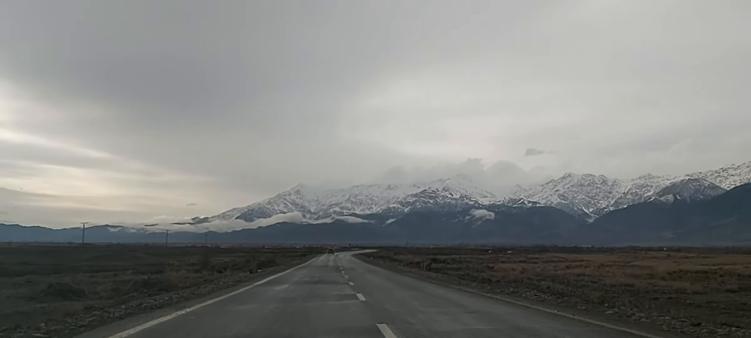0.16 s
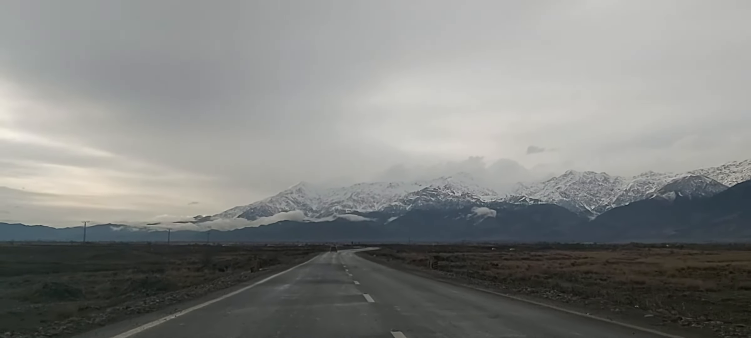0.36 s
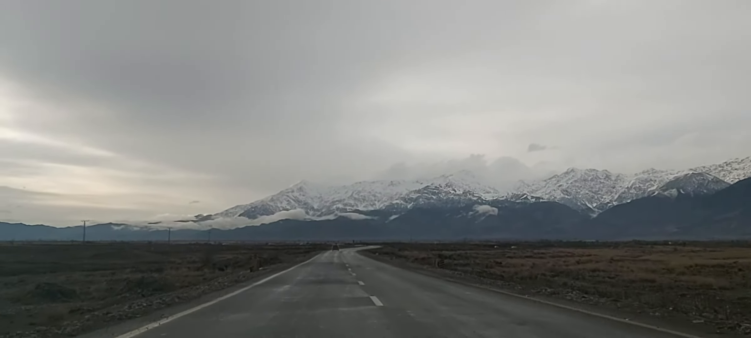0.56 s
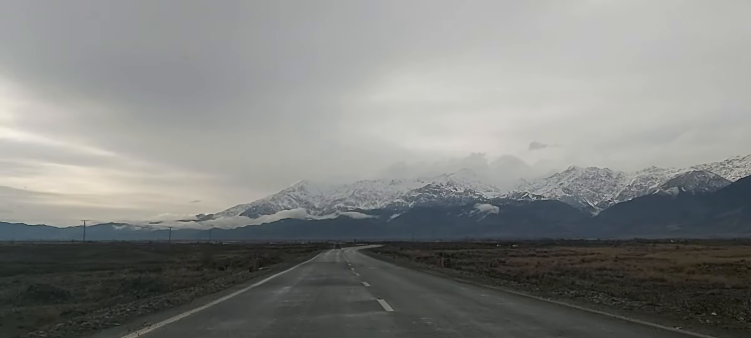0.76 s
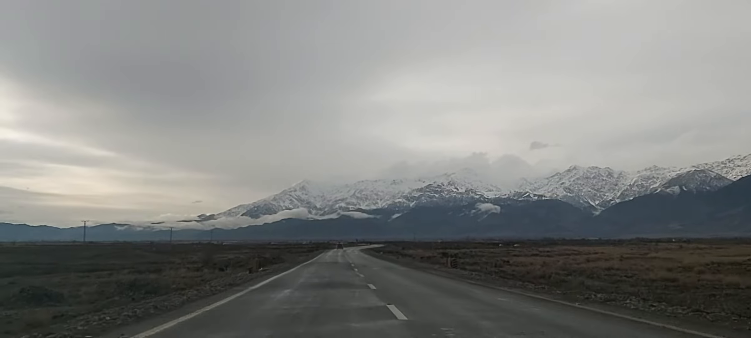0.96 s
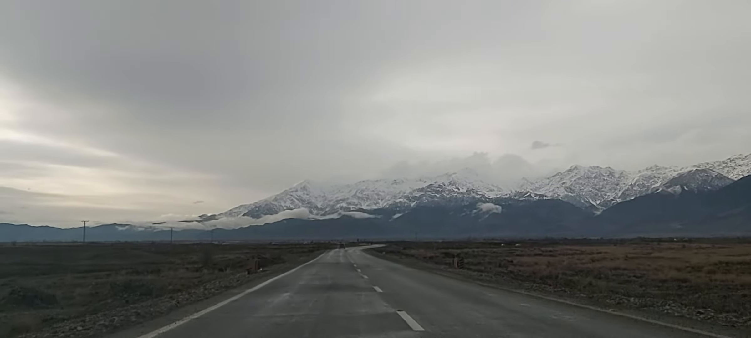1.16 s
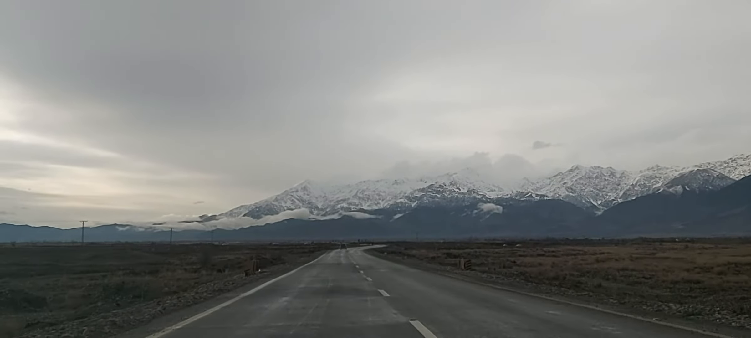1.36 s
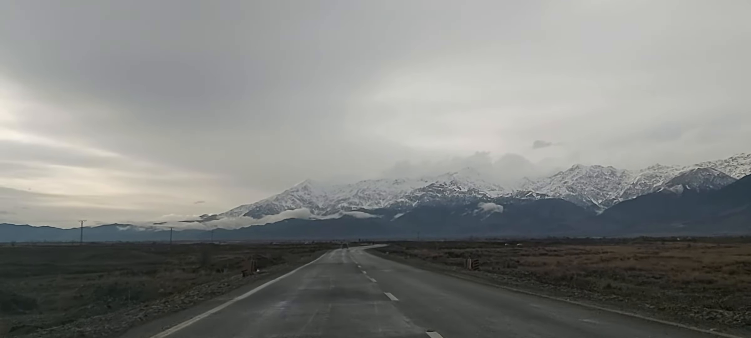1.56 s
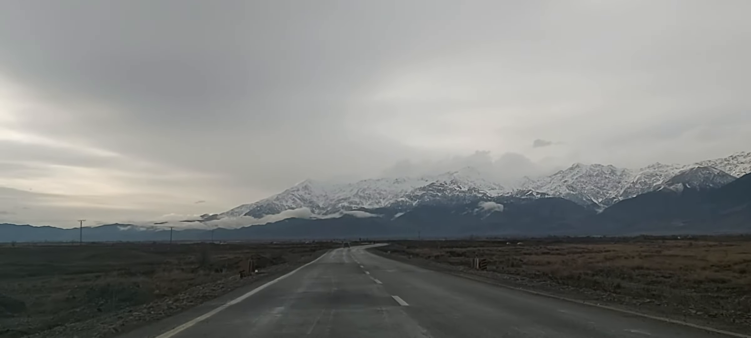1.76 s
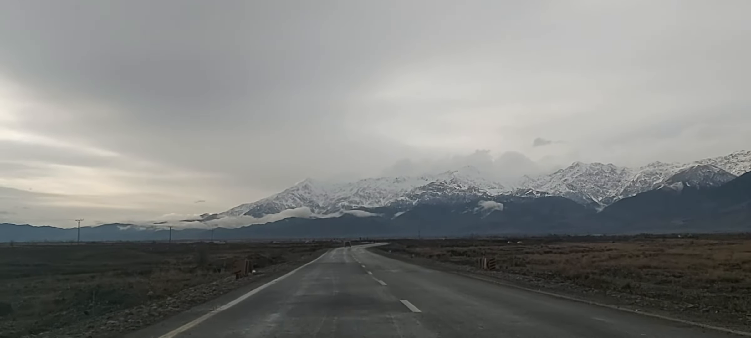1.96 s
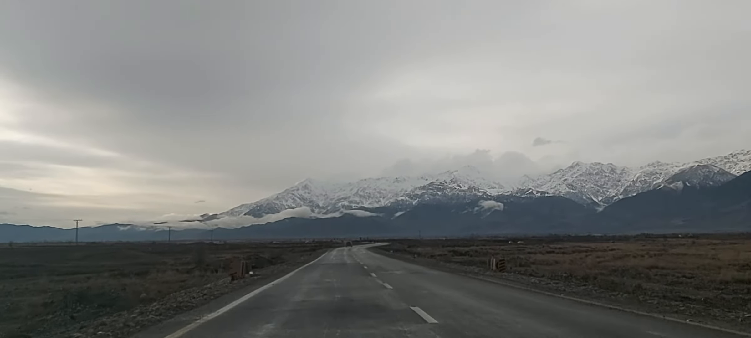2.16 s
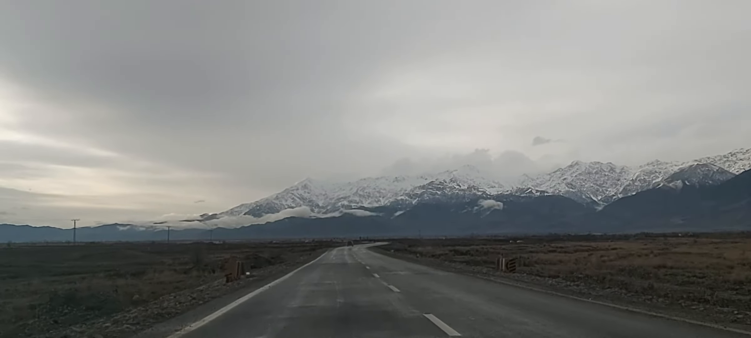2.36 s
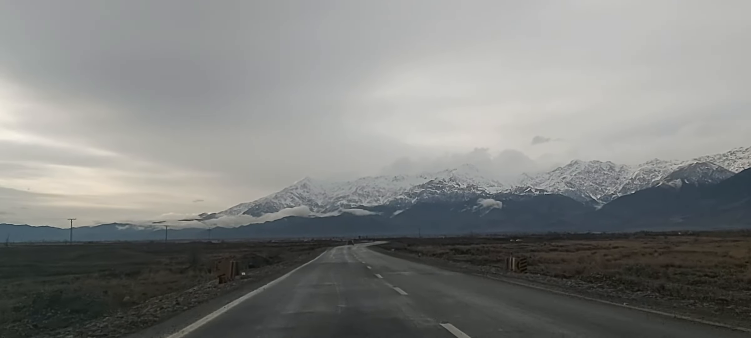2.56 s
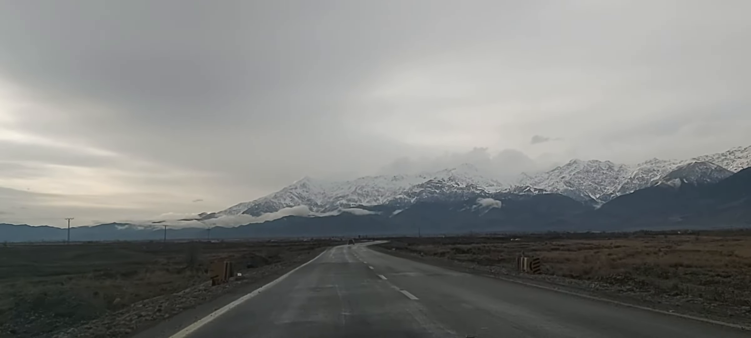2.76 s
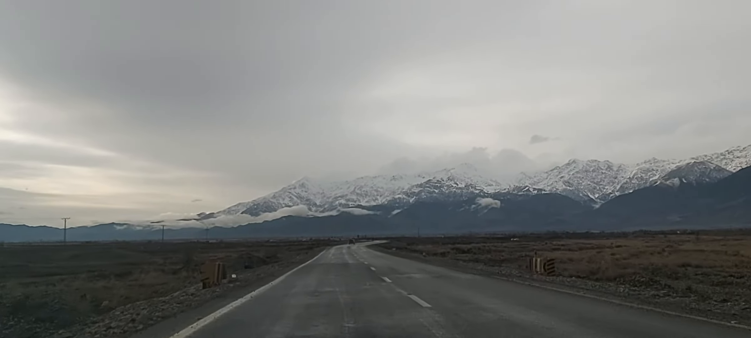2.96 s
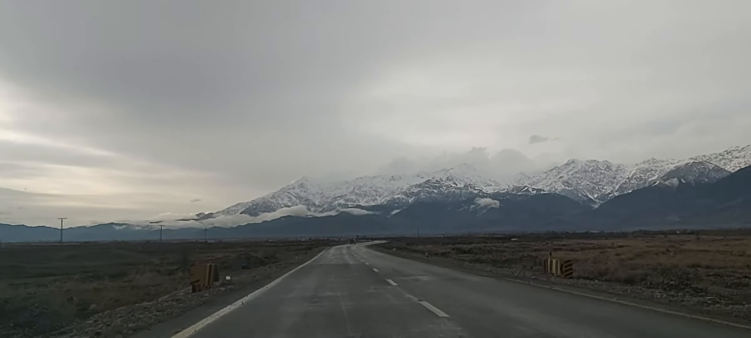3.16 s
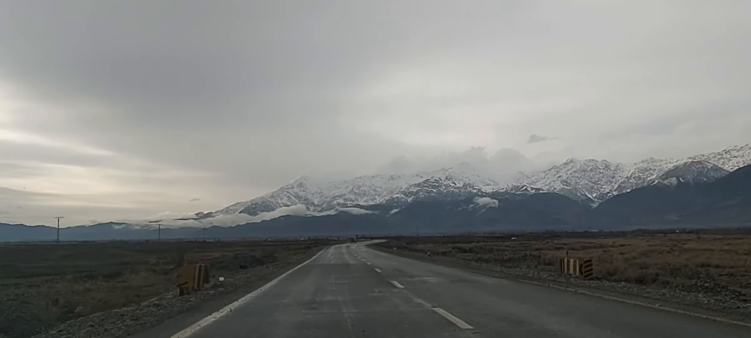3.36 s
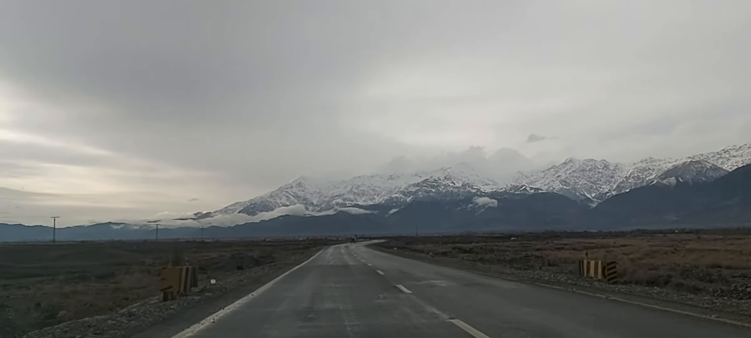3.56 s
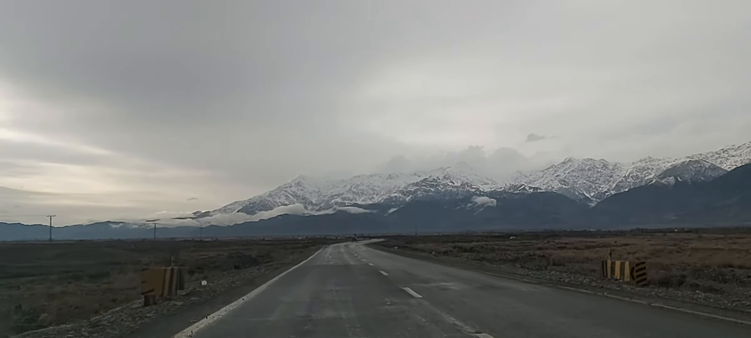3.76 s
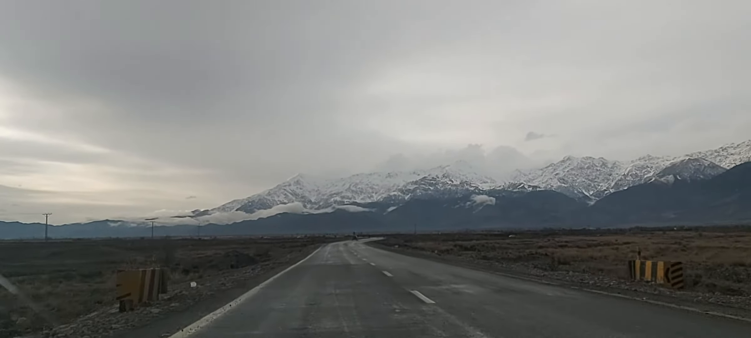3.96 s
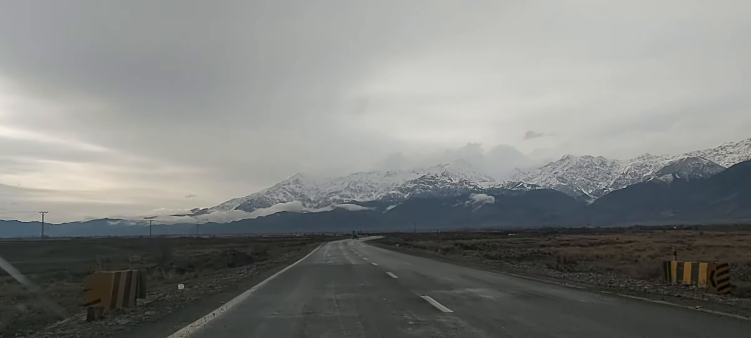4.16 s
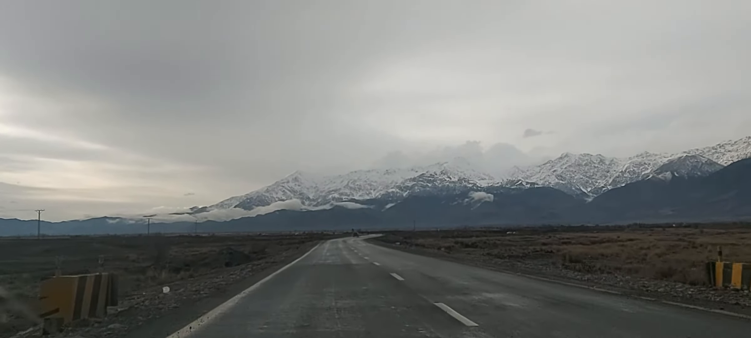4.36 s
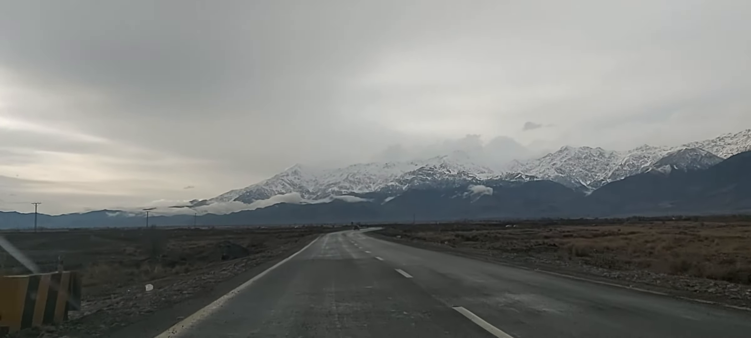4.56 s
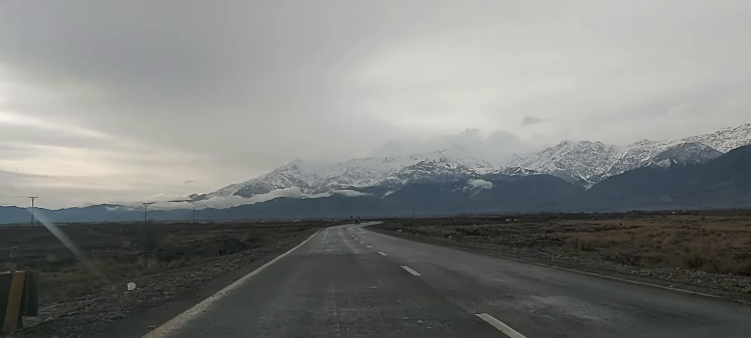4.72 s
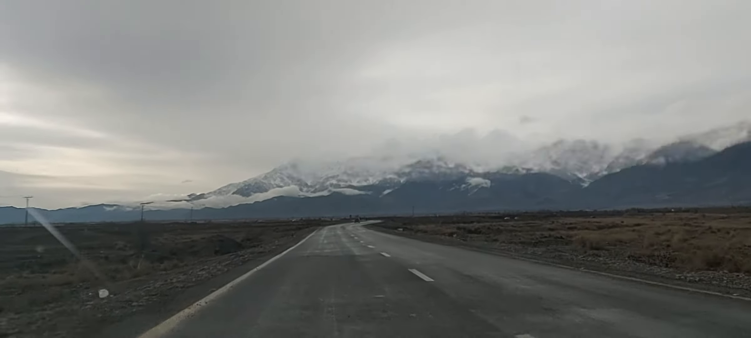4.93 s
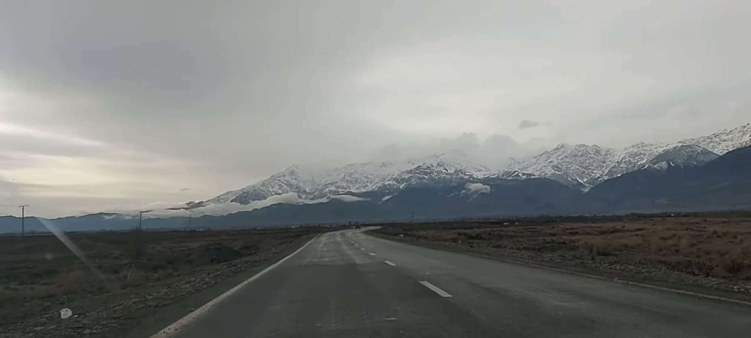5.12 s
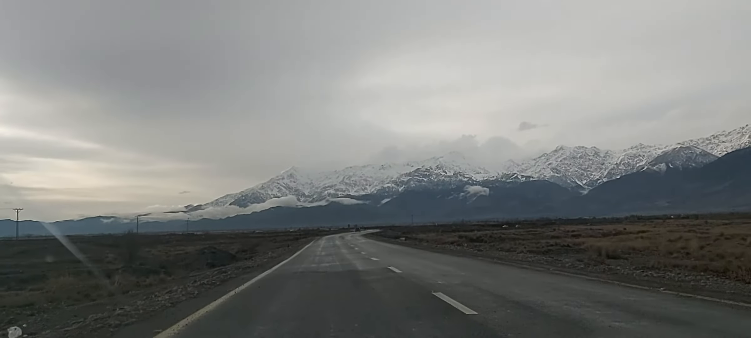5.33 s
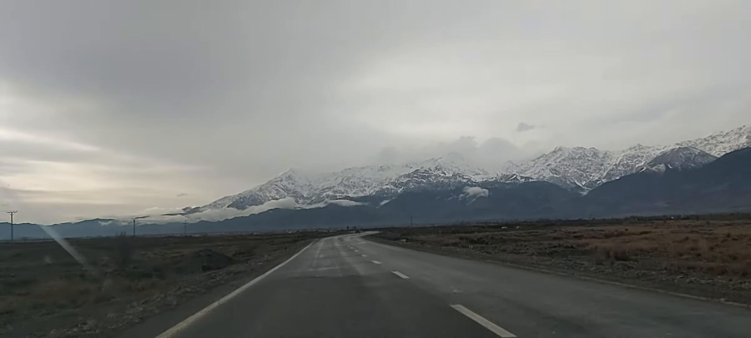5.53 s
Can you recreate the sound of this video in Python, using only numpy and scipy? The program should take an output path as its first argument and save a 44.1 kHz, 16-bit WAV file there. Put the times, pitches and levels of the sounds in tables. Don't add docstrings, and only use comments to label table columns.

```python
import sys
import numpy as np
from scipy import signal
from scipy.fft import rfft, irfft, next_fast_len
from scipy.io import wavfile
from scipy.ndimage import uniform_filter1d

SR = 44100
rng = np.random.default_rng(int(sys.argv[2]) if len(sys.argv) > 2 else 0)


def dump_mix(stems):
    frames = np.atleast_2d(stems).T
    limited = np.clip(frames, -1, 1)
    pcm = np.round(limited * 32767).astype(np.int16)
    wavfile.write(sys.argv[1], SR, pcm)


def field_ratio(decibels):
    return 10 ** (np.asarray(decibels, dtype=float) / 20)


N = 250929
SIZE = next_fast_len(N)
FREQ = np.fft.rfftfreq(SIZE, 1 / SR) + 1e-3
TIME = np.arange(N) / SR


def coloured(spectrum, points):
    hz, db = np.transpose(points)
    return spectrum * field_ratio(np.interp(np.log(FREQ), np.log(np.maximum(hz, 1)), db))


def unit(x):
    return x / np.sqrt(np.mean(x ** 2))


def curves(table):
    s, *columns = np.transpose(table)
    return [np.interp(TIME, s, c) for c in columns]


def walk(rate):
    hold = int(SR / rate)
    steps = np.repeat(rng.standard_normal(N // hold + 1), hold)
    return 1.3 * uniform_filter1d(uniform_filter1d(steps, hold), hold)[:N]


def sides(pan_db):
    gain = field_ratio(np.array([[pan_db / 2], [-pan_db / 2]]))
    return gain / gain.mean()


def add(out, s, sound):
    i = int(s * SR)
    out[:, i:i + sound.shape[1]] += sound[:, :N - i]


def ring(modes, t):
    total = 0
    for k, (hz, db, t60) in enumerate(modes):
        total = total + (-1) ** k * field_ratio(db - 60 * t / t60) * np.sin(2 * np.pi * hz * t)
    return total


# f/Hz, left-right correlation
PORT_CORRELATION = [(30, 0.91), (200, 0.96), (400, 0.71), (700, 0.2), (1100, -0.41), (2500, .05),
                    (8000, -0.15)]
# f/Hz, left minus right level/dB
PORT_LEAN = [(60, -2), (110, -5.5), (200, -4), (380, -5), (700, -3.5), (1290, -5), (2380, -9.5),
             (4400, -8.5), (8120, -8), (15000, -9)]


def rush(colour, edges_hz, flicker_db, rate):
    hz, alike = np.transpose(PORT_CORRELATION)
    alike = np.interp(np.log(FREQ), np.log(hz), alike)
    mid, side = (coloured(rfft(rng.standard_normal(SIZE)), colour) for _ in range(2))
    mid, side = mid * np.sqrt(1 + alike), side * np.sqrt(1 - alike)
    lean = np.sqrt(coloured(np.ones(len(FREQ)), PORT_LEAN))
    pair = np.array([(mid + side) * lean, (mid - side) / lean])
    out = 0
    for lo, hi in zip(edges_hz, edges_hz[1:]):
        rise = np.clip(.5 + 6 * np.log(FREQ / lo), 0, 1)
        fall = np.clip(.5 - 6 * np.log(FREQ / hi), 0, 1)
        band = irfft(pair * np.sin(rise * fall * np.pi / 2), SIZE)[:, :N]
        out = out + band * field_ratio(flicker_db * walk(rate))
    return out / np.sqrt(np.mean(out.mean(axis=0) ** 2))


# t/s, roughness level/dB
ROUGHNESS = [(0, 3.5), (.14, -2.5), (.45, 4), (.6, 3.5), (.76, -2.5), (.88, 4), (1.1, -8), (2.12, -7),
             (2.2, -1), (2.5, -6.5), (2.7, 7), (2.79, -2.5), (2.88, 1), (3.3, -1.5), (3.44, -5.5),
             (3.55, 1), (5.55, 1), (5.69, -10.5)]
# f/Hz, spectral level/dB per Hz
BOOM_COLOUR = [(15, -30.5), (25, -18), (34, -12.5), (44, -7), (50, 1.5), (56, -5.5), (68, -11.5),
               (85, -4.5)]
# f/Hz, spectral level/dB per Hz
ROAD_COLOUR = [(60, -12), (80, 0), (124, -6), (140, -5), (153, -11.5), (189, -5.5), (207, -7), (222, -15.5),
               (255, -5), (278, -12.5), (298, -1.5), (315, -6), (338, -19.5), (420, -14)]


def road():
    rough_db, = curves(ROUGHNESS)
    boom = rush(BOOM_COLOUR, [12, 80], flicker_db=0.4, rate=6.7)
    floor = rush(ROAD_COLOUR, [85, 110, 146.6, 240.5], flicker_db=0.7, rate=12)
    floor_share = 0.37
    return field_ratio(-23.5 + rough_db) * boom + field_ratio(-27 + floor_share * rough_db) * floor


# t/s, level/dB, f/Hz, length/s, growth/dB
THUMPS = [(.43, -13.5, 141, 0.052, -2.5), (.803, -16.5, 115.3, 0.019, 2), (.826, -5.5, 134, 0.046, -6),
          (.877, -6, 135.3, .07, -7.5), (2.868, -14, 121.5, 0.033, 13.5), (4.159, -6, 125, 0.029, -0.5),
          (4.57, -20, 118.1, 0.033, -2), (4.962, -8.5, 123, 0.029, -9), (5.325, -2.5, 135, .04, -11),
          (5.369, -8.5, 143, 0.017, -5.5), (5.398, -1.5, 137.7, 0.045, -11),
          (5.546, -1.5, 142.4, 0.03, -6.5), (5.574, -13.5, 144, 0.025, -3),
          (5.626, -7, 144.9, 0.069, -14.5)]


def thumps():
    out = np.zeros((2, N))
    panel_hz, edge_s = 134, 0.0071
    for s, db, hz, length, growth_db in THUMPS:
        samples = length * SR + 200
        u = np.arange(int(length * SR) + 200) / samples
        from_edge_s = np.minimum(u, 1 - u) * len(u) / SR
        swell = field_ratio(db + growth_db * u) * np.tanh((from_edge_s / edge_s) ** 2)
        pitch = hz + max(panel_hz - hz, 0) * u
        add(out, s - .002, swell * np.sin(2 * np.pi * np.cumsum(pitch) / SR) * sides(-3.0))
    return out


# t/s, firing rate f/Hz, load level/dB
ENGINE = [(0, 62.02, -2), (.5, 63.94, 1.5), (1.0, 65.02, -1.5), (1.6, 65.54, -1), (2.1, 66.32, 0),
          (2.45, 66.14, 2), (2.65, 62.63, -5.5), (2.95, 59.92, 3), (3.5, 59.84, -1.5), (4.4, 59.05, 1.5),
          (4.6, 55.93, -2), (4.9, 55.96, -1.5), (5.05, 58.64, -1.5), (5.69, 55.87, -2.5)]
# f/Hz, level/dB
MOUNTS = [(57, -26.5), (62, -27), (66, -36), (112, -27.5), (132, -30), (178, -32.5), (190, -42), (198, -35)]
# f/Hz, level/dB; only the points after the first are used
MOUNTS_TOP = [(198, -33), (230, -46)]


def engine():
    hz, load_db = curves(ENGINE)
    phase = 2 * np.pi * np.cumsum(hz * (1 + 0.0027 * walk(6))) / SR
    mount_hz, mount_db = np.transpose(MOUNTS + MOUNTS_TOP[1:])
    hum = 0
    for k in range(1, 5):
        level_db = load_db + np.interp(k * hz, mount_hz, mount_db) + 1.9 * walk(8.0)
        hum = hum + field_ratio(level_db) * np.sin(k * phase + k)
    return np.sqrt(2) * hum * sides(-3.5)


def case_hits(events, modes, again_db, tail_db, muffle, thin):
    out, t = np.zeros((2, N)), TIME[:2000] - .001
    chance = rng.standard_normal((len(events), 2, len(t)))
    after = np.maximum(t, 0)
    for (s, db, pan_db, hz, crack_db), noise in zip(events, chance):
        push = np.where(t < 0, np.exp(-(t * hz / .3) ** 2), np.exp(-(after * hz / .8) ** 1.5))
        hit = push * np.cos(2 * np.pi * hz * t) + field_ratio(crack_db) * ring(modes, after)
        hit = hit + field_ratio(again_db) * np.roll(uniform_filter1d(hit, size=5), 95)
        dull = hit + muffle * (uniform_filter1d(hit, size=4) - hit) - thin * uniform_filter1d(hit, size=11)
        far = field_ratio(-abs(pan_db)) * (np.roll(dull, 22) - .5 * np.roll(dull, 36))
        scatter = noise * np.exp(-TIME[:len(t)] / 0.007)
        tail = field_ratio(tail_db) * signal.fftconvolve(scatter, dull[None, :200], axes=1)[:, :len(t)]
        ports = np.array([hit, far] if pan_db > 0 else [far, hit])
        add(out, s - .001, field_ratio(db) * (ports + tail))
    return out


# t/s, near port level/dB, left minus right level/dB, knock f/Hz, crack above knock level/dB
TAPS = [
    (.6815, -47, -7.5, 975, -0.5),
    (4.9757, -36, 9, 2000, 0),
    (5.114, -18, -10.5, 1700, -6),
    (5.1662, -36, 2, 1303, -1),
    (5.2065, -14, -26, 1250, -16),
    (5.5389, -23.5, -19, 1542, -7.5),
    (5.597, -38, -6.5, 1800, -4),
]
# f/Hz, level/dB, t60/s
CASE_MODES = [(3600, 3.5, .003), (5603, -3, 0.0017), (7400, -4, 0.0015), (10000, -5, .0012),
              (14300, -8, .0012)]
LEFT_SNAP = [
    (4.8129, -14, 37, 1700, 2.5),
]
# f/Hz, level/dB, t60/s
LEFT_MODES = [(3250, 1.5, 0.0021), (4330, -1.5, 0.0059), (5800, -2.5, 0.0013), (8000, -9, 0.0017),
              (11000, -5, 0.0014), (15000, -14, .001)]
RIGHT_SNAP = [
    (4.9151, -18.5, -11, 660, 19),
]
# f/Hz, level/dB, t60/s
RIGHT_MODES = [(2380, -14.5, 0.004), (4430, -14.5, 0.0032), (5400, -18, 0.0042), (7440, -12.5, 0.0026),
               (10800, -5, 0.0012), (15200, 0, .0012)]


def taps():
    soft = case_hits(TAPS, CASE_MODES, again_db=-27.5, tail_db=-36, muffle=.3, thin=.8)
    left = case_hits(LEFT_SNAP, LEFT_MODES, again_db=-19, tail_db=-39, muffle=.2, thin=0.34)
    right = case_hits(RIGHT_SNAP, RIGHT_MODES, again_db=-1.5, tail_db=-44, muffle=0.28, thin=.1)
    return soft - left + right


# t/s, length/s, level/dB, centre f/Hz
RUB = [
    (4.845, 0.054, -59.5, 5407),
    (4.971, 0.03, -62.5, 6900),
    (5.144, .075, -62, 6490),
    (5.498, .07, -69, 6900),
    (5.594, .008, -63, 6900),
]


def rub():
    edges_hz = [2500, 7000, 17000]
    dull = rush([(2500, -22.0), (4000, -2), (5200, 3), (7000, -6.5), (8400, -18), (10500, -15), (16000, -11.5)],
                edges_hz, flicker_db=3.0, rate=130)
    sharp = rush([(3000, -25.5), (5500, -2), (7500, -5), (8400, -12), (11000, -8), (16000, -14)],
                 edges_hz, flicker_db=2.0, rate=100)
    edge_s, fade_s, press_db = .01, .02, 3
    out = 0
    for s, length, db, hz in RUB:
        u = np.clip((TIME - s) / length, 0, 1)
        off = np.maximum((s - TIME) / edge_s, (TIME - s - length) / fade_s).clip(0)
        bright = np.clip((hz - 4500) / 2500, 0, 1)
        out = out + field_ratio(db + press_db * u) * np.exp(-off) * ((1 - bright) * dull + bright * sharp)
    return out * sides(12.5)


def housing_strikes(events, modes, snap, snap_db, pan_db, spread_s, trim_db):
    out, t = np.zeros((2, N)), TIME[:5000]
    echoes = (1 - np.exp(-t / 0.00091)) * (np.exp(-t / spread_s) + field_ratio(-20.0) * np.exp(-t / 0.05))
    impulse = np.fft.fftshift(irfft(coloured(np.ones(len(FREQ)), snap), SIZE))
    impulse = impulse[SIZE // 2 - 64:SIZE // 2 + 64]
    scatter = rng.standard_normal((2, len(t)))
    loose = rng.standard_normal((len(events), 2, len(t)))
    for (s, db), chance in zip(events, loose):
        burst = signal.fftconvolve(echoes * (scatter + .4 * chance), impulse[None], axes=1)
        click = field_ratio(snap_db) * unit(burst[:, 64:64 + len(t)])
        housing = 0
        for (hz, mode_db, t60, start), nudge in zip(modes, chance[0]):
            age = np.maximum(t - start, 0)
            ports = np.array([[1.02 * (1550 / hz) ** 2.5], [1]])
            build_up = 1 - np.exp(-age / 0.0013)
            housing = housing + ports * build_up * ring([(hz, mode_db + .8 * nudge, t60)], age)
        click = click + unit(housing)
        click[0] = np.roll(click[0], 40)
        add(out, s - .001, field_ratio(db + trim_db) * unit(click) * sides(pan_db))
    return out


# t/s, rms level/dB
TOCKS = [
    (0.265, -29),
    (0.9265, -32.5),
    (1.6116, -31.5),
    (2.2965, -30.5),
    (2.9816, -30),
    (3.6665, -30.5),
    (4.3511, -32),
    (5.0355, -30.5),
]
# f/Hz, level/dB, t60/s, start t/s
TOCK_MODES = [(1635, 6, 0.027, 0.0062), (1957, -17, 0.025, 0.0066), (2390, -7, 0.058, .001),
              (2545, -1, 0.045, 0.0016), (2850, -9.5, .03, 0.0014), (3362, -3.5, 0.04, 0.001404),
              (3580, -8.5, 0.021, .001)]
# f/Hz, spectral level/dB per Hz
TOCK_SNAP = [(900, -35), (1500, -7), (2500, -11), (3500, -11), (4600, -25.5), (5600, -23), (6500, -18),
             (7600, -21), (8600, -34.5), (11500, -28), (13500, -32), (16000, -33.5)]
# t/s, rms level/dB
TICKS = [
    (0.6071, -34),
    (1.2685, -35),
    (1.9535, -35.5),
    (2.6388, -32.5),
    (3.3237, -34.5),
    (4.0088, -35.5),
    (4.6938, -36),
    (5.3785, -36.5),
]
# f/Hz, level/dB, t60/s, start t/s
TICK_MODES = [(1600, -0.5, .03, 0.0024), (2024, -6, 0.038, .006), (2340, -1, 0.034, .001),
              (2660, 2, .018, .0003), (2945, -2.5, 0.015, .004), (3650, -6.5, .035, 0.00203),
              (6710, -7, 0.02, 0.0045)]
# f/Hz, spectral level/dB per Hz
TICK_SNAP = [(900, -35), (1500, -26.5), (2500, -0.5), (3700, -13.5), (5000, -21), (6700, -16),
             (8100, -27.5), (9600, -16), (11200, -20), (13500, -18.5), (16000, -26.5)]


def indicator():
    tocks = housing_strikes(TOCKS, TOCK_MODES, TOCK_SNAP, snap_db=-3.5, pan_db=-10, spread_s=0.012, trim_db=-17.5)
    ticks = housing_strikes(TICKS, TICK_MODES, TICK_SNAP, snap_db=4.5, pan_db=-10.5, spread_s=0.012, trim_db=-18.5)
    return tocks + ticks


# t/s, rms level/dB
RATTLES = [
    (.482, -40.5),
    (.81, -37),
]
# f/Hz, level/dB, t60/s, start t/s
RATTLE_MODES = [(1250, 0, .02, 0.00097), (1700, -5.5, .02, 0.009), (2360, -6, .02, .002)]
# f/Hz, spectral level/dB per Hz
RATTLE_SNAP = [(700, -34), (1300, 3.5), (2500, -2), (4500, -19), (7000, -25), (10000, -28.5), (16000, -48)]


def rattles():
    return housing_strikes(RATTLES, RATTLE_MODES, RATTLE_SNAP, snap_db=4, pan_db=-14.5, spread_s=0.0078,
                           trim_db=-19.5)


# t/s, gust level/dB
GUSTS = [(0, 0.5), (.2, 1), (.95, -2), (1.9, -1), (2.5, 2.5), (3.1, 1), (4.69, 0), (4.9, 0.5), (5.2, 1),
         (5.69, -2)]
# f/Hz, spectral level/dB per Hz
WIND_COLOUR = [(220, -20.5), (380, -5), (427, -1.5), (556, -14), (576, -7.5), (603, -4.5), (632, -8),
               (824, -22), (883, -19.5), (1030, -14.5), (1290, -23.5), (2220, -28.5), (2930, -35),
               (3820, -40), (6000, -53.5), (7800, -86), (13200, -120)]
# f/Hz, spectral level/dB per Hz
HISS_COLOUR = [(4500, -1), (5500, -5.5), (7500, -6), (8600, -12.5), (10500, -13.5), (11800, -8.5),
               (15000, -15.5), (16600, -21)]


def wind():
    gust_db, = curves(GUSTS)
    tyres = rush(ROAD_COLOUR, [244.3, 276.6, 341.2, 387.6], flicker_db=0.9, rate=6.6)
    low = rush(WIND_COLOUR, [410, 530.4, 810, 1110], flicker_db=0.43, rate=9.2)
    glass = rush(WIND_COLOUR, [1144, 1800, 2770, 3900, 5500], flicker_db=0.5, rate=19)
    hiss = rush(HISS_COLOUR, [5500, 9000, 17000], flicker_db=.8, rate=11)
    gusty = field_ratio(-31 + gust_db) * tyres + field_ratio(-44.5 + gust_db) * low
    glass_share = 0.75
    return gusty + field_ratio(-57 + glass_share * gust_db) * glass + field_ratio(-80.5) * hiss


def scene():
    return road() + thumps() + engine() + taps() + rub() + indicator() + rattles() + wind()


def top_cut(x):
    return signal.sosfilt(signal.butter(12, 16960, fs=SR, output="sos"), x)


def record(dry):
    dry = signal.sosfilt(signal.butter(2, 32, "high", fs=SR, output="sos"), dry)
    dry = signal.sosfilt(signal.ellip(6, .3, 32, 15750, fs=SR, output="sos"), dry)
    return top_cut(dry)


dry = scene()
out = record(dry)
dump_mix(out)
```